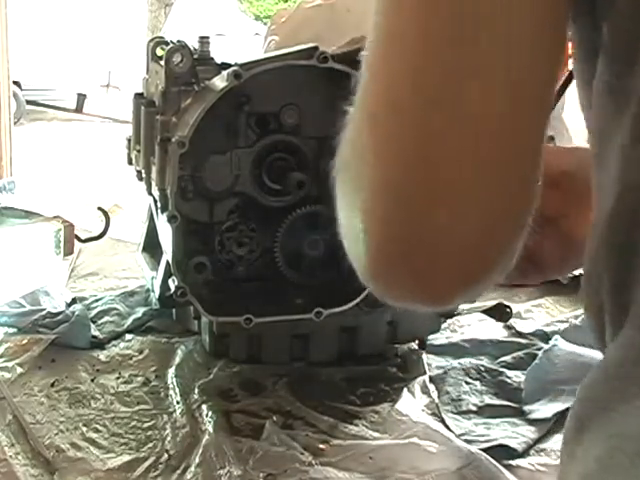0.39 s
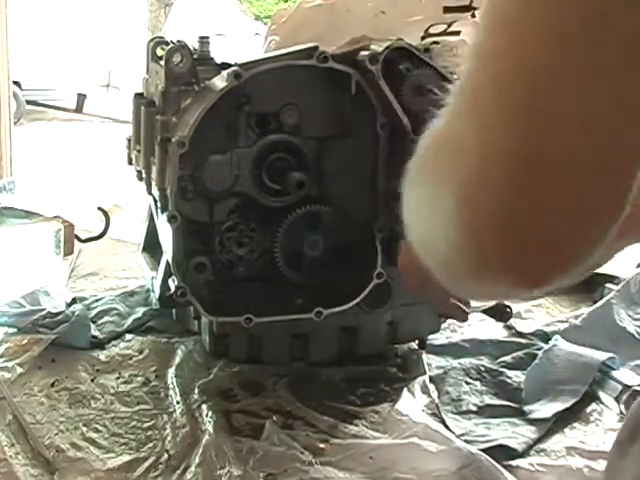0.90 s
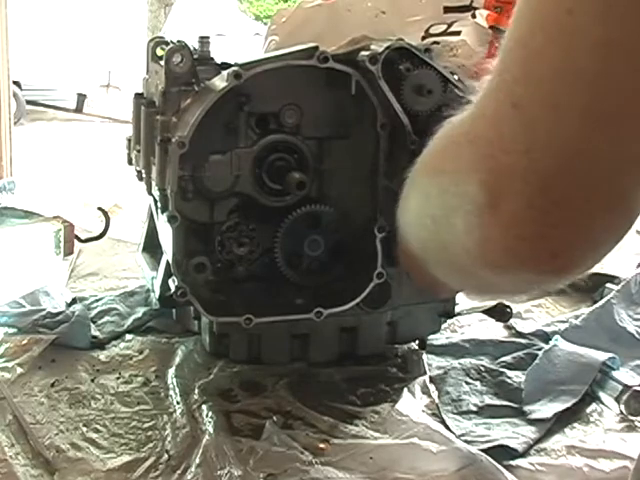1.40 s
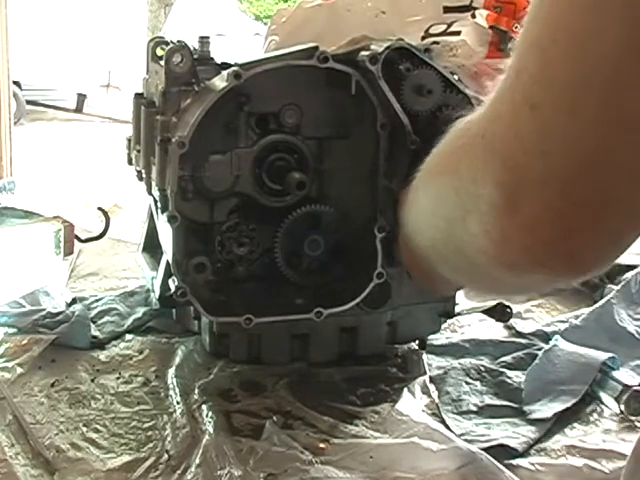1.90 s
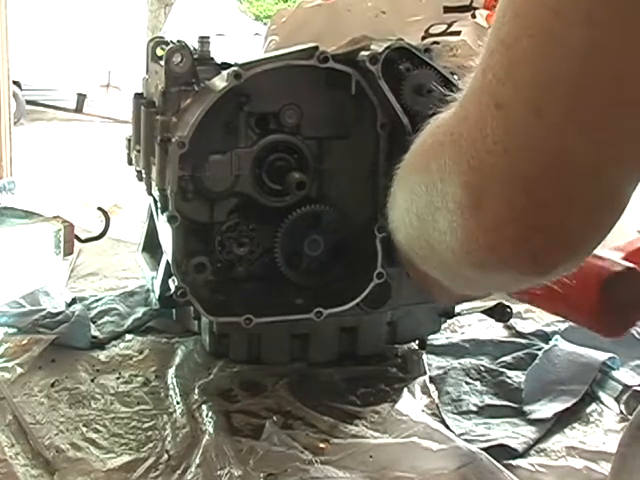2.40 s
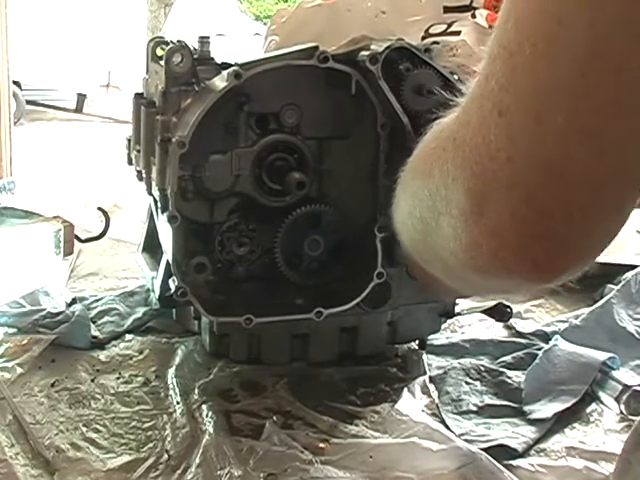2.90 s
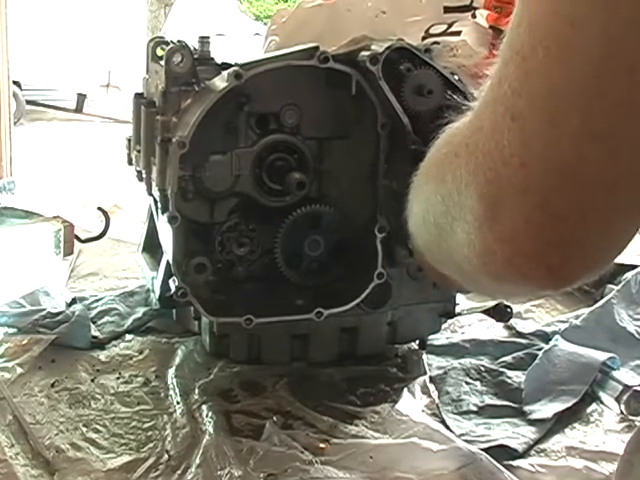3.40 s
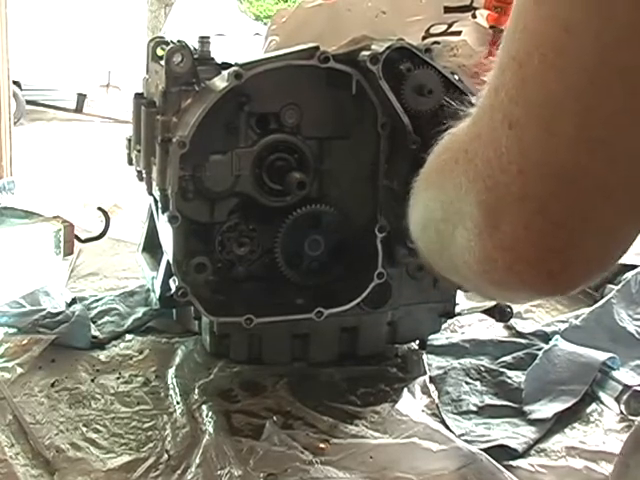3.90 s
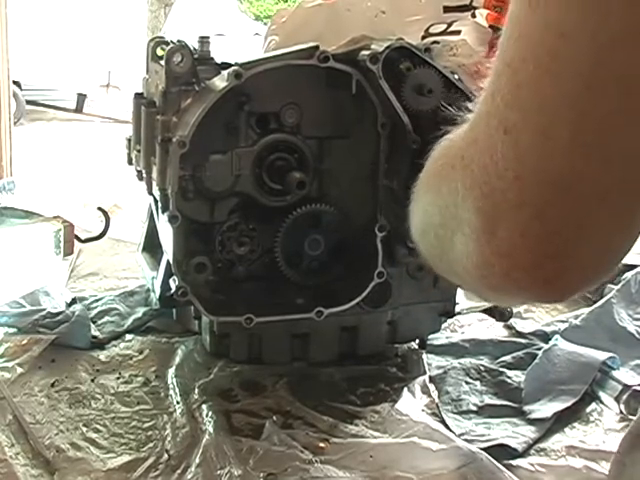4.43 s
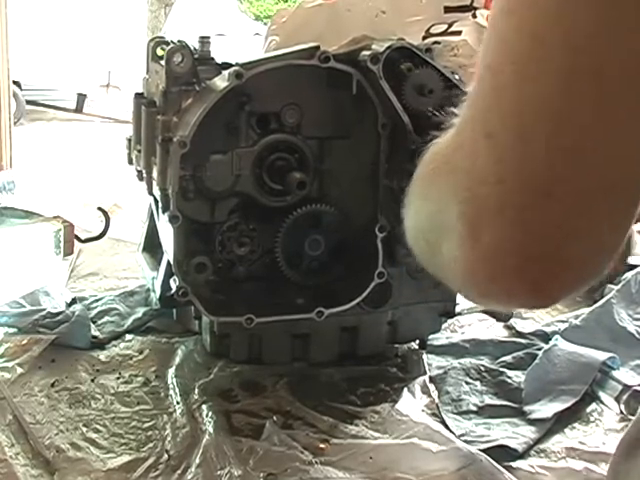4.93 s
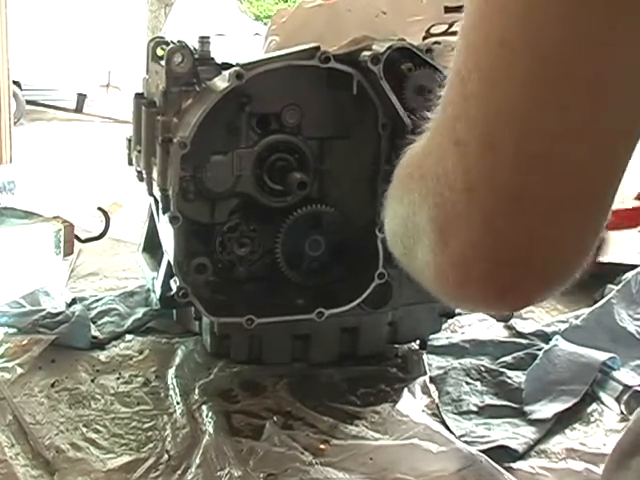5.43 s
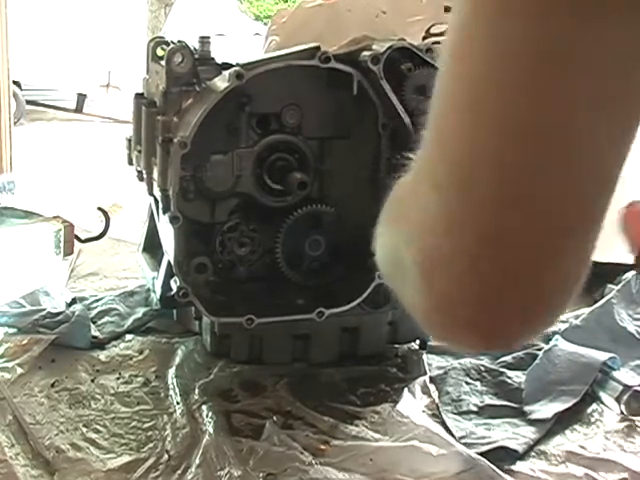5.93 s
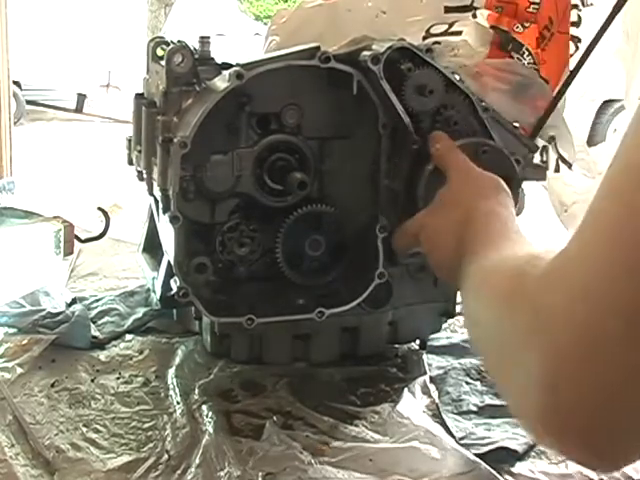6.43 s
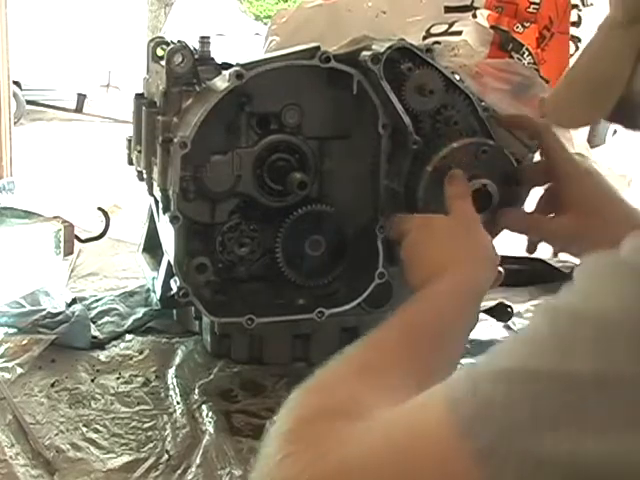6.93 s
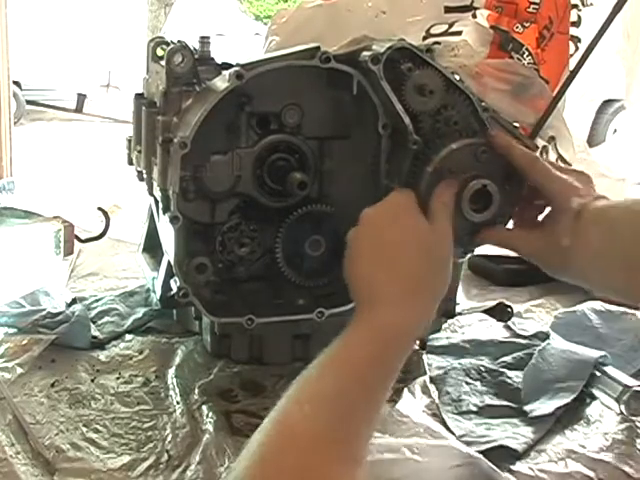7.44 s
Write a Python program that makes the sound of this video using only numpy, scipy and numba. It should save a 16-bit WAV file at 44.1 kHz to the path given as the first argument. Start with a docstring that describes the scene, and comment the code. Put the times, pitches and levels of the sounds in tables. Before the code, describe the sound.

An open garage with faint yard hum and hiss, heard by a small camera about a metre away. From 0 to 1.2 s there are light clicks, cloth rubbing, dry plastic snaps and soft low bird pipes. A short tool rub at 1.55 s precedes a moderate mallet blow on a cast engine case at 1.7. From 2.55 to 5.55 s eleven more blows follow, roughly every 0.3 s: hard bright cracks with metallic clank, thin steel ringing and a third of a second of echo. They grow louder and more clanging, the last two strongest, clipped and squashed. Sleeves swish between them. From 5.5 to 6.5 s birds pipe and chirp quickly amid plastic snaps and small bumps. A heavy double-contact thud booms in the bench at 6.64. Then rustling hands, small knocks, a bird pipe at 7.1, a sharp snap at 7.44 and ringing metal rubbing until the end near 7.57.

```python
"""Mallet on an engine case

Open garage, small camera a metre from the bench: a mallet taps a part onto a cast engine case. Each blow
is a noise crack, a clank of modes and dense echoes, and decaying sines for the steel tip. A thud booms in
the bench; shaped noise makes ticks, cloth and snaps, and random clicks through resonances the rubbed metal.
Birds pipe outside as wavering sines over a faint hum. The camera clips the blows and pulls its gain down."""
import sys
import numpy as np
from scipy import signal
from scipy.fft import rfft, irfft
from scipy.io import wavfile
from scipy.ndimage import uniform_filter1d
from numba import njit

SR = 44100
rng = np.random.default_rng(int(sys.argv[2]) if len(sys.argv) > 2 else 0)


def nominal_scale(level):
    """Amplitude ratio for a level in decibels (scalar or array-like)."""
    x = np.asarray(level, float) / 20
    return 10 ** x


def pcm_store(signal):
    """Save signal as 16-bit PCM."""
    levels = np.round(np.clip(np.atleast_2d(signal), -1, 1) * 32767)
    wavfile.write(sys.argv[1], SR, levels.astype(np.int16).T)


N = 333832
T = np.arange(N) / SR
LR = np.array([[1.], [-1.]])  # left and right sign of a side signal

# Mallet blows: (time [s], level [dB], thump [dB], brightness [dB], clang [dB], tip ring [dB])
BLOWS = [(1.7293, -20.5, -3, -12.5, -5, -60), (2.561, -17, 7, -3, -38, -47),
         (2.884, -12.5, -1, -1.5, -3, -43), (3.235, -11, -1, -5.5, -32, -39.5),
         (3.499, -15, -2.5, -6, -11, -47), (3.791, -11, -4, -5, -3, -52), (4.095, -14, 2, 1, -4, -39),
         (4.392, -8.5, 0.5, 0.5, 8.5, -47), (4.670, -11, 0.5, 3, 9.5, -33.5),
         (4.977, -11, 0, -2.5, -2.5, -56), (5.2665, -4, -3.5, 0.5, 5.5, -58),
         (5.562, -5.5, -5, 0, 4.5, -31.5)]
# Centres of thump, body, crack and edge: (frequency [Hz])
BLOW_BANDS_HZ = [300, 1200, 4000, 11000]
# Spectrum of the crack at contact: (frequency [Hz], level [dB])
BLOW_COLOUR = [(35, -53), (60, -43.5), (417, -4.5), (924, -1.5), (1340, -6.5), (2250, -3.5), (2770, -5),
               (3580, -6), (4420, -12), (4970, -10), (8510, -23), (9350, -18.5), (16000, -40.5)]
# Short rings of the contact: (frequency [Hz], width [Hz])
CRACK_PEAKS = [(1400, 640), (4300, 1000)]
# Spectrum of the clank's tail: (frequency [Hz], level [dB])
CLANK_COLOUR = [(35, -53), (60, -7), (469, -5.5), (593, -12.5), (715, -6.5), (1200, -8), (1380, -6.5),
                (1620, -9), (2000, -7.5), (4420, -14.5), (6430, -23.5), (12700, -40), (16000, -54)]
# The small case radiates little bass: (frequency [Hz], level [dB])
THIN_BASS = [(80, -9), (150, -6), (230, 0)]
# Strongest modes of the engine case: (frequency [Hz], width [Hz], level [dB])
CASE_MODES = [(500, 53, 0.5), (1068, 30, -8), (1740, 92, -10), (1980, 90, -10), (2626, 38, -0.5),
              (2880, 140, -1.5), (3960, 94, -2.5), (4450, 77, -12)]
# Modes of the steel tip: (frequency [Hz], decay by 60 dB [s], level [dB])
TIP_MODES = [(5230, 0.2, -3), (7560, 0.33, 2), (12302, 0.27, 0)]
# Thud on the bench: (time [s], level [dB])
THUD = [(6.638, -7.5), (6.645, -9)]
# Spectrum of the thud's contact: (frequency [Hz], level [dB])
THUD_COLOUR = [(35, -56), (60, -40), (212, 6), (389, -4), (553, -4), (682, -34), (991, -2), (1440, -24),
               (4120, -8), (5460, -20), (16000, -25.5)]
# Spectrum of the thud's boom: (frequency [Hz], level [dB])
BOOM_COLOUR = [(35, -79), (60, -39), (256, -2.5), (323, -30), (354, -4.5), (540, -6.5), (803, -14),
               (1380, -20), (3040, -27.5), (16000, -55)]
# Modes of the bench top: (frequency [Hz], width [Hz], level [dB])
BENCH_MODES = [(122, 27, 3.5), (208, 20, 6.5), (251, 58, 11.5), (486, 76, -2), (782, 33, 2), (987, 41, 7)]
# Bumps, knocks and rebounds:
# (time [s], level [dB], centre [Hz], width [octaves], decay by 60 dB [s], left minus right [dB])
TICKS = [(.018, -25.5, 4480, 0.4, 0.019, -2), (.061, -39.5, 740, 1.4, 0.1, 3),
         (0.13, -21, 4500, 1.05, 0.022, -2.5), (0.55, -44, 4400, 0.4, 0.018, 0),
         (.549, -37, 880, 2.6, 0.067, 0), (3.705, -29.5, 1820, 1.56, 0.043, -3),
         (3.707, -35, 1370, 0.25, 0.25, 2), (3.822, -6, 1940, 1.46, 0.024, -3),
         (4.118, -16, 3460, 1.5, .025, 0), (5.985, -23, 520, 1.67, 0.022, -2),
         (6.225, -39, 696, 2.8, 0.075, 1), (6.436, -35.5, 323, 0.34, 0.02, 4),
         (6.475, -34.5, 3680, 1.4, 0.16, -2), (6.516, -36, 1010, 0.23, 0.051, -.5),
         (6.806, -27.5, 1780, 1.7, 0.013, -7), (6.961, -22.5, 1900, 1.66, 0.023, -3),
         (7.168, -28, 5500, 4.6, 0.012, 0), (7.29, -39.5, 534, .35, .08, 6),
         (7.368, -34, 590, 2.4, 0.16, -1), (7.494, -33, 640, 0.4, 0.24, 2)]
# Rubbing of a tool, before a common lift: (time [s], level [dB])
TOOL_RUB = [(1.5, -78), (1.526, -82), (1.548, -59.5), (1.586, -48), (1.65, -65), (1.71, -61)]
# Resonances of the tool: (frequency [Hz], width [Hz], level [dB])
TOOL_MODES = [(445, 68, -2), (790, 33, 2), (980, 33, 6), (1370, 120, -10), (1900, 220, -28)]
# Rubbing of the steel wheel, before the same lift: (time [s], level [dB])
WHEEL_RUB = [(7.3, -64), (7.394, -47), (7.446, -50), (7.504, -42), (7.556, -51), (7.57, -44)]
# Resonances of the wheel: (frequency [Hz], width [Hz], level [dB])
WHEEL_MODES = [(1340, 78, -12), (1690, 62, 8.5), (2700, 120, -10), (3820, 72, -7), (6400, 120, -13),
               (9540, 160, -5.5)]
# Busy hands: (time [s], cloth hiss level [dB], skin rub level [dB])
BUSY = [(0, -84, -50.5), (0.25, -75, -56), (0.4, -65.5, -55.5), (0.65, -69, -55), (0.95, -61.5, -54.5),
        (1.1, -74, -61), (1.5, -72, -58), (2.5, -71, -60), (3.6, -77, -57.5), (4.15, -62, -54),
        (4.3, -58, -52), (4.6, -52, -46), (4.9, -76, -55.5), (5.8, -64, -50.5), (6.4, -60, -50.5),
        (6.7, -53, -45.5), (7.0, -48.5, -41.5), (7.25, -50.5, -46.5), (7.57, -48, -44.5)]
# Sleeve swishes: (time [s], level [dB], decay by 60 dB [s])
SWISHES = [(0.256, -71, 0.12), (0.78, -64, 0.13), (0.96, -56, .2), (1.185, -61, .1), (1.65, -64, 0.28),
           (2.19, -66, 0.22), (2.49, -64, .15), (2.698, -53, 0.14), (2.77, -53.5, 0.34), (3.124, -57, 0.21),
           (3.428, -50.5, 0.11), (3.70, -53, .15), (4.01, -54, 0.16), (4.298, -48.5, 0.17),
           (4.602, -59, .2), (4.888, -53, 0.42), (5.195, -52.5, 0.13), (5.483, -51, 0.11),
           (5.77, -59, 0.18), (6.0, -49, 0.46), (6.24, -52, 0.12), (6.483, -41.5, 0.14), (6.935, -48, 0.31)]
# Dry snaps of stiff plastic sheet: (time [s], level [dB], centre [Hz])
SNAPS = [(0.1884, -35, 9000), (0.379, -42, 5210), (0.541, -43, 8190), (0.583, -37, 10400),
         (0.684, -42, 5070), (0.855, -48, 5260), (1.0176, -37, 5730), (1.3932, -45.5, 8000),
         (2.1241, -45, 7350), (2.302, -47, 6000), (5.8611, -35, 5190), (5.9349, -34, 8790),
         (6.0382, -32.5, 5930), (6.245, -34, 8000), (6.3036, -43, 5660), (6.3769, -34, 7130),
         (6.568, -34, 7510), (6.867, -37, 7390), (7.21, -40, 6500), (7.437, -25, 6710)]
# Low piping bird: (time [s], length [s], pitch [Hz], level [dB])
PIPING = [(0.03, 0.17, 2245, -49.5), (0.16, 0.13, 2220, -51.5), (0.375, 0.097, 2049, -47),
          (0.66, .09, 1844, -52), (0.935, .06, 1810, -59), (1.045, .05, 2880, -53.5),
          (5.77, 0.066, 2210, -49.5), (5.87, .11, 2280, -47), (6.0, 0.12, 2280, -44.5),
          (6.11, 0.17, 2250, -51), (6.3, 0.059, 2223, -46), (6.41, 0.073, 2230, -47),
          (6.522, .06, 2240, -46), (7.12, 0.071, 2230, -48)]
# High chirping bird: (time [s], length [s], pitch [Hz], level [dB])
CHIRPS = [(5.53, 0.033, 4140, -50), (5.75, 0.064, 4310, -52), (5.862, .07, 4480, -50),
          (5.966, 0.078, 4570, -49), (6.082, 0.052, 4500, -46.5), (6.178, 0.077, 4240, -48),
          (6.2, 0.074, 3680, -47), (6.293, 0.064, 4430, -46), (6.385, 0.09, 4370, -50)]
# Decay of the garage, before each source's stretch: (frequency [Hz], decay by 60 dB [s])
GARAGE_DECAY = [(100, 0.28), (260, 0.32), (700, 0.34), (1840, 0.38), (4850, 0.31), (12800, 0.32)]
# Stereo spread of the garage, before each source's offset: (frequency [Hz], side minus mid [dB])
GARAGE_SIDE = [(60, -19), (110, -5), (200, -11.5), (380, -21), (700, 2.5), (1290, -13), (2380, 0),
               (4400, -1.5), (8120, -6), (15000, -1.5)]
# Spectrum of the yard's hum and hiss: (frequency [Hz], level [dB])
AIR_COLOUR = [(26, -35), (45, -12), (109, -1), (210, -0.5), (299, -10), (382, -5.5), (411, -4), (672, -10),
              (741, -7), (838, -9.5), (1150, -10.5), (2130, -16), (2410, -15.5), (3660, -23.5),
              (16000, -43)]
# Tilt of the yard's side signal against its mid: (frequency [Hz], level [dB])
AIR_SIDE = [(60, 13), (110, -6), (200, 2), (380, 6), (700, 4.5), (1290, 1), (2380, 7), (4400, 6), (8120, 5),
            (15000, 11)]


def along(table, hz):
    """Reads a (frequency, value) table on a log-frequency axis."""
    f, v = np.transpose(table)
    return np.interp(np.log(hz + 1), np.log(f), v)


def unit(x):
    """Scales to an rms of 1."""
    return x / np.sqrt(np.mean(x ** 2))


def coloured(x, *tables):
    """Shapes the spectrum by the sum of the dB tables."""
    size = x.shape[-1]
    hz = np.fft.rfftfreq(size, 1 / SR)
    gain_db = sum(along(t, hz) for t in tables)
    return irfft(rfft(x) * nominal_scale(gain_db), size)


def noise(size, *tables):
    """Coloured noise with an rms of 1."""
    return unit(coloured(rng.standard_normal(size), *tables))


def band(x, hz, width_hz):
    """Two-pole resonance, gain 1 at the centre."""
    return signal.lfilter(*signal.iirpeak(min(hz, 0.45 * SR), hz / width_hz, fs=SR), x)


def fade(size, t60):
    """Exponential decay that reaches -60 dB after t60 seconds."""
    return nominal_scale(-60 * T[:size] / t60)


def add(out, s, x):
    """Adds a sound at time s, cut at the end of the scene."""
    i = int(s * SR)
    out[..., i:i + x.shape[-1]] += x[..., :N - i]


def walk(rate):
    """Random levels held 1 / rate s and slewed twice; rms 1."""
    k = int(SR / rate)
    steps = np.repeat(rng.standard_normal(N // k + 1), k)
    return unit(uniform_filter1d(uniform_filter1d(steps, k), k)[:N])


def curve(table, column=1):
    """Draws straight lines between the rows of a timed table."""
    rows = np.transpose(table)
    return np.interp(T, rows[0], rows[column])


def gate(table, edge_s=0.0028):
    """Open while the table runs, with soft ends."""
    return np.clip(np.minimum(T - table[0][0], table[-1][0] - T) / edge_s, 0, 1)


def placed(x, pan_db):
    """Sets the left minus right level at the microphone."""
    return x * nominal_scale(LR * pan_db / 2)


def tail(stretch, rise_s, side_db):
    """Dense garage echoes that build up over milliseconds, then die away at a rate set band by band."""
    size, out = 1 << 15, 0
    for hz in 60 * 2 ** np.arange(0, 8.1, 1):
        mid, side = (band(rng.standard_normal(size), hz, hz * 0.54) for _ in range(2))
        side = side * nominal_scale(along(GARAGE_SIDE, hz) + side_db)
        out = out + (mid + LR * side) * fade(size, stretch * along(GARAGE_DECAY, hz))
    out *= 1 - np.exp(-T[:size] / rise_s)
    return out / np.sqrt(np.sum(out ** 2) / 2)  # mean energy of the two channels 1


def clank(colour, modes, db, stretch, side_db, uneven_db):
    """Crowded modes and walls blur into a coloured tail; the strongest modes stand out, unevenly struck."""
    blur = coloured(tail(stretch, 0.002, side_db), *colour)[:, :SR * 5 // 8]
    struck_db = uneven_db * rng.standard_normal(len(modes))
    x = blur
    for (hz, width_hz, mode_db), extra_db in zip(modes, struck_db):
        x = x + nominal_scale(mode_db + extra_db) * band(blur, hz, width_hz)
    return nominal_scale(db) * x / np.sqrt(np.mean(x[:, :2048] ** 2))  # level set by the first 46 ms


def ring(hz, t60):
    """One lightly damped mode, its level wavering a little."""
    size = SR // 2
    waver = 1 + 0.24 * unit(uniform_filter1d(rng.standard_normal(size), size=300))
    return np.sin(2 * np.pi * hz * T[:size]) * fade(size, t60) * waver


def mallet():
    """Each blow: a hard crack, the clank of case and garage, the thin ring of the steel tip."""
    out = np.zeros((2, N))
    low_peak, high_peak = CRACK_PEAKS
    for s, db, thump_db, bright_db, clang_db, tip_db in BLOWS:
        band_db = [thump_db, 0, bright_db, bright_db + 2.5]  # the edge lies above the crack
        shade = list(zip(BLOW_BANDS_HZ, band_db))
        mid, side = (noise(2048, BLOW_COLOUR, shade) for _ in range(2))
        mid = mid + nominal_scale(1 + 0.8 * clang_db) * band(mid, *low_peak)
        mid = mid + nominal_scale(5.5 + bright_db) * band(mid, *high_peak)
        envelope = fade(2048, 0.036) * np.minimum(T[:2048] / 0.00023, 1)
        crack = (unit(mid) + LR * nominal_scale(-17.5) * side) * envelope
        add(out, s, nominal_scale(db + 8.0) * crack)
        modes = [(1365, 110, clang_db)] + CASE_MODES  # the clang mode varies from blow to blow
        colour = [CLANK_COLOUR, shade, THIN_BASS]
        add(out, s, clank(colour, modes, db - 5.5, stretch=0.98, side_db=-3.5, uneven_db=1.5))
        add(out, s, sum(nominal_scale(tip_db + mode_db) * ring(hz, t60) for hz, t60, mode_db in TIP_MODES))
    return out


def thud():
    """A heavy weight lands in two steps: a short burst each, and the boom of the bench top's modes."""
    out = np.zeros((2, N))
    for s, db in THUD:
        add(out, s, nominal_scale(db - 6.0) * noise(4096, THUD_COLOUR) * fade(4096, 0.043))
        add(out, s, clank([BOOM_COLOUR], BENCH_MODES, db - 3, stretch=0.94, side_db=-3.5, uneven_db=0.0))
    return out


def ticks():
    """Short bursts of noise around each contact's own pitch; the lower ones set in more softly."""
    out = np.zeros((2, N))
    for s, db, hz, octaves, t60, pan_db in TICKS:
        half = 2 ** (octaves / 2)
        hump = [(hz / half ** 3, -36), (hz / half, -4), (hz, 0), (hz * half, -4), (hz * half ** 3, -36)]
        shape = fade(8192, t60) * np.minimum(T[:8192] * hz / 0.17, 1)
        add(out, s, placed(nominal_scale(db) * noise(8192, hump) * shape, pan_db))
    return out


def rubbed(table, peaks, slips_per_s=3400.0):
    """Uneven stick-slip clicks sing through the resonances of the part."""
    clicks = (rng.random(N) < slips_per_s / SR) * rng.standard_normal(N)
    clicks = clicks + 0.084 * rng.standard_normal(N)  # fine grain between slips
    body = sum(nominal_scale(db) * unit(band(clicks, hz, width_hz)) for hz, width_hz, db in peaks)
    return unit(body) * nominal_scale(curve(table) + 7) * gate(table)


def hands():
    """Cloth hisses in the treble with a fine crackle, swishes higher still; skin and sleeves rub lower."""
    crackle = nominal_scale(3.6 * rng.exponential(size=N))
    crackle = unit(uniform_filter1d(crackle, size=40))
    rustle = noise(N, [(3000, -15), (7000, 7.5), (10000, 6.0), (16000, 0.5)])
    rustle = rustle * nominal_scale(curve(BUSY) + 0.83 * walk(13))
    swing = swishes()
    swish = noise(N, [(3000, -12), (8000, -1), (10500, 2.5), (16000, -3.5)]) * swing
    rub = noise(N, [(60, -49), (200, 4.5), (800, 1.0), (2500, 3), (5000, -4), (9000, -18), (16000, -40)])
    skin_level = nominal_scale(curve(BUSY, column=2) + 1.9 * walk(25))
    rub = rub * (skin_level + nominal_scale(-8) * swing)
    return (rustle + swish) * crackle + rub


def swishes():
    """Level of the sleeve swishes: a quick swell up to each time, then an exponential decay."""
    out, rise_s = np.zeros(N), 0.015
    for s, db, t60 in SWISHES:
        swell = np.exp(np.minimum(T - s, 0) / rise_s)
        decay = nominal_scale(-60 * np.maximum(T - s, 0) / t60)
        out += nominal_scale(db) * np.where(T < s, swell, decay)
    return out


def snaps():
    """Plastic sheet snaps as brief bright noise; fainter chance snaps rise and fall with the skin rub."""
    out = np.zeros(N)
    faint_per_s, faint_db = 4, 12.5  # least level above the skin rub
    when, size, pitch = rng.random((faint_per_s * N // SR, 3)).T
    busy_db = curve(BUSY, column=2)[(when * N).astype(int)]
    faint = zip(when * N / SR, busy_db + faint_db + 6 * size, 5000 + 3000 * pitch)
    for s, db, hz in [*SNAPS, *faint]:
        hump = [(hz / 4, -25), (hz / 2.8, -3), (hz, 0), (hz * 1.9, -3)]
        add(out, s, nominal_scale(db - 5.5) * noise(512, hump) * fade(512, 0.01))
    return out


def bird(notes, overtone_db, waver, glide):
    """Wavering notes with a weak octave; a random flutter of level stands for echoes on their way in."""
    out, wobble = np.zeros(N), waver * walk(80)
    flutter = 0.5 + 0.6 * walk(300)
    rise_s, sag_db = 0.0067, -8.5  # a note speaks quickly and sags to its end
    for s, length, hz, db in notes:
        part = np.clip((T - s) / length, 0, 1)
        pitch_hz = hz * (1 + glide * (part - 0.5) + wobble)
        phase = 2 * np.pi * np.cumsum(pitch_hz) / SR
        tone = np.sin(phase) + nominal_scale(overtone_db) * np.sin(2 * phase)
        shape = nominal_scale(db + sag_db * part) * gate([(s,), (s + length,)], rise_s)
        out += np.sqrt(2) * tone * flutter * shape
    return out


def garage(x, wet_db):
    """The walls' answer to the small sounds, by convolution with dense echoes."""
    echoes = tail(0.67, 0.0039, side_db=1.5)
    return nominal_scale(wet_db) * signal.fftconvolve(x[None], echoes, axes=1)[:, :N]


def air():
    """The hum and hiss of the yard: mid and side noise, each drifting a little in level."""
    level_db = -57.5
    mid = noise(N, AIR_COLOUR) * nominal_scale(level_db + 2.03 * walk(3.58))
    side = noise(N, AIR_COLOUR, AIR_SIDE) * nominal_scale(level_db - 1.0 + 0.79 * walk(3.1))
    return mid + LR * side


def scene():
    """Places the near sounds before the microphone, then adds the garage's answer and the yard."""
    small, hand = ticks(), hands() + snaps()
    rubs = rubbed(TOOL_RUB, TOOL_MODES) + rubbed(WHEEL_RUB, WHEEL_MODES)
    birds = bird(PIPING, -26, waver=0.01486, glide=-0.0084)
    birds = birds + bird(CHIRPS, -26, waver=0.0042, glide=0.047)
    near = placed(mallet(), 0.22) + placed(thud(), 0.51) + small
    near = near + placed(rubs + hand, -0.84) + placed(birds, 0.3)
    wet = nominal_scale(-7.5) * small.mean(axis=0) + nominal_scale(-5.5) * rubs + nominal_scale(-6) * hand + nominal_scale(-1.0) * birds
    return near + garage(wet, wet_db=0.85) + air()


@njit
def gain_control(size, top, attack, release, slope):
    """Follows the loudness quickly up and slowly down; turns down what lies above top."""
    gain, e = np.empty(len(size)), 0.
    for i in range(len(size)):
        e += (size[i] - e) * (attack if size[i] > e else release)
        gain[i] = min(1., (top / (e + 1e-9)) ** slope)
    return gain


def roll_off(x):
    """The treble ends steeply here."""
    return signal.sosfilt(signal.butter(12, 17150, fs=SR, output="sos"), x)


def record(dry):
    """The camera's gain control comes some milliseconds late, so loud blows meet the ceiling first."""
    attack, release = 1 / (0.00092 * SR), 1 / (0.06 * SR)
    gain = gain_control(np.abs(dry).max(axis=0), nominal_scale(-16.0), attack, release, 0.42)
    late_gain = np.roll(gain, shift=int(0.0038 * SR))
    ceiling = 0.53
    x = dry * late_gain / ceiling
    x = ceiling * x / (1 + x ** 6) ** (1 / 6)  # rounded clipping
    x = x + 0.11 * band(x, 5800.0, 4000.0)  # a presence lift makes the flat tops overshoot
    x = signal.sosfilt(signal.butter(3, 75., "high", fs=SR, output="sos"), x)
    x = signal.sosfilt(signal.ellip(8, 0.2, 70, 16600, fs=SR, output="sos"), x)  # steep treble limit
    return roll_off(x)


dry = scene()
out = record(dry)
pcm_store(out)
```